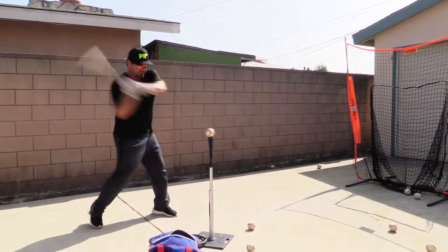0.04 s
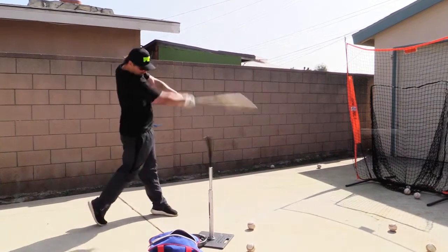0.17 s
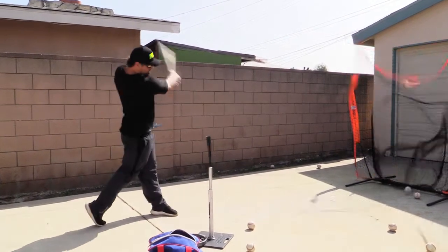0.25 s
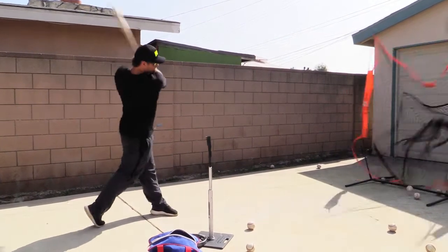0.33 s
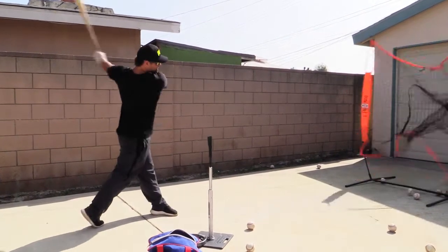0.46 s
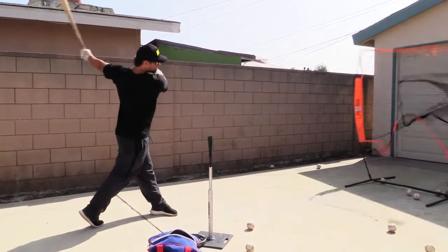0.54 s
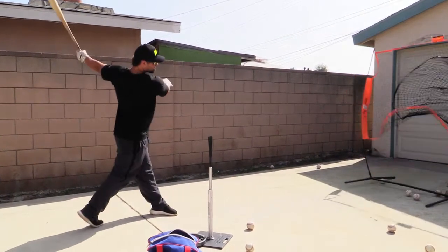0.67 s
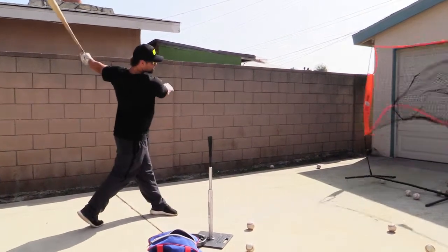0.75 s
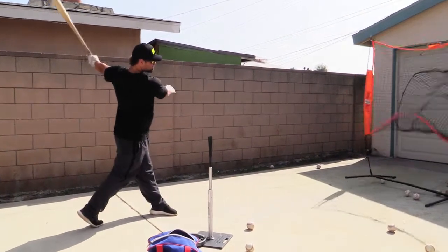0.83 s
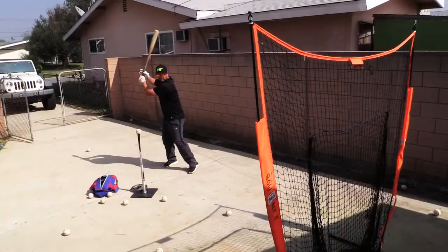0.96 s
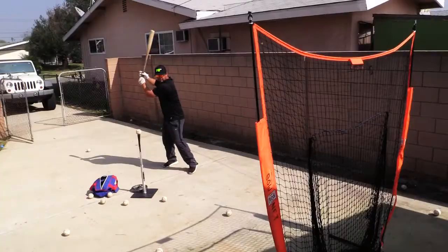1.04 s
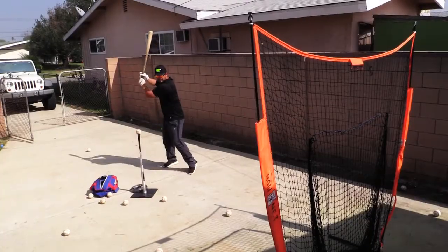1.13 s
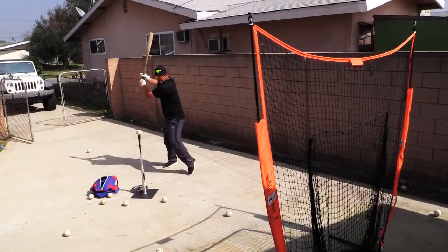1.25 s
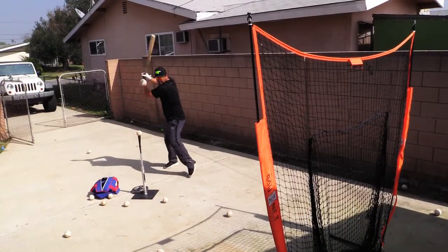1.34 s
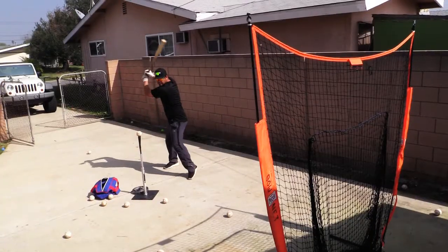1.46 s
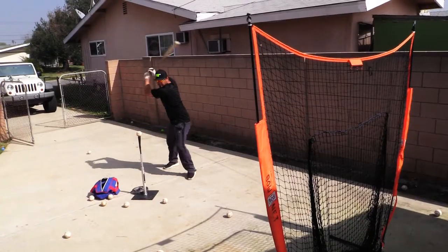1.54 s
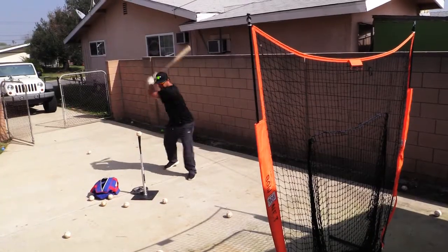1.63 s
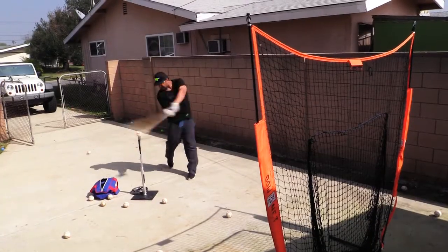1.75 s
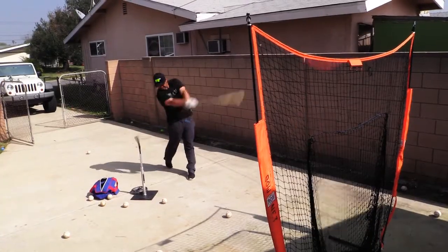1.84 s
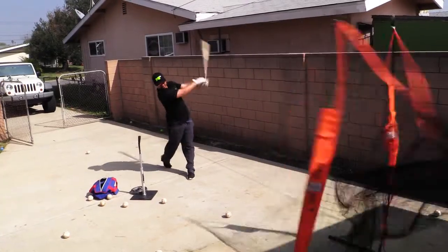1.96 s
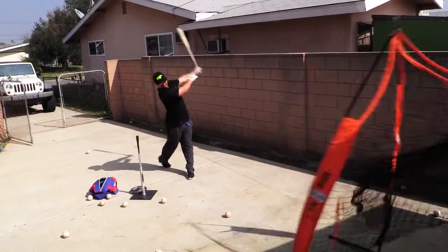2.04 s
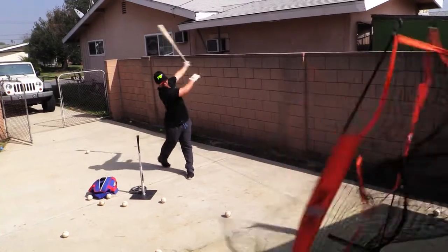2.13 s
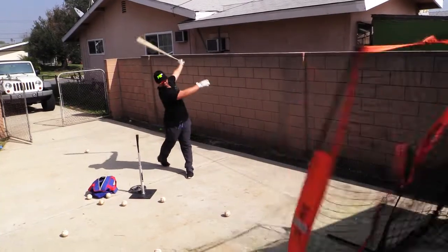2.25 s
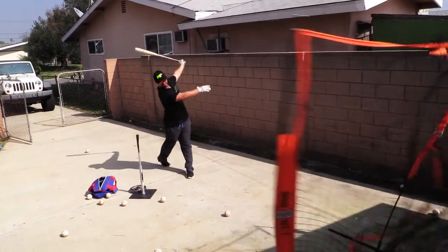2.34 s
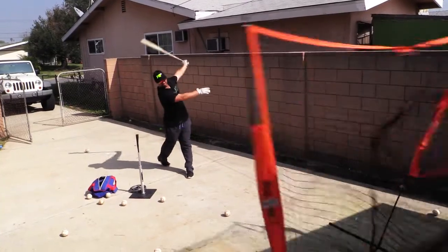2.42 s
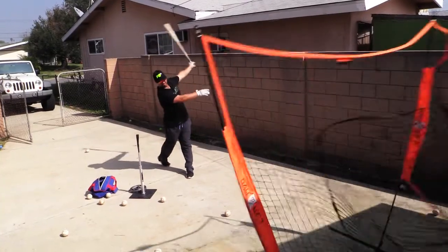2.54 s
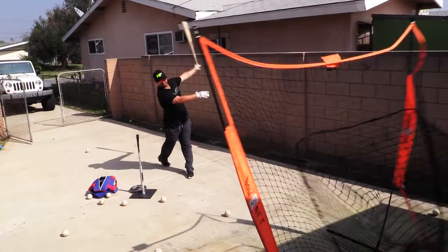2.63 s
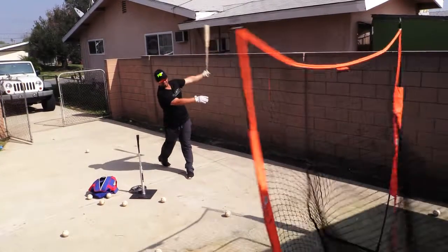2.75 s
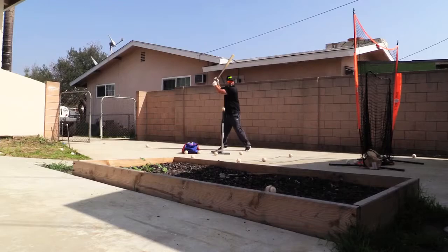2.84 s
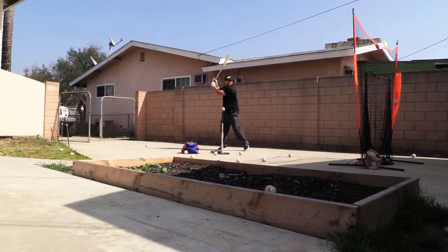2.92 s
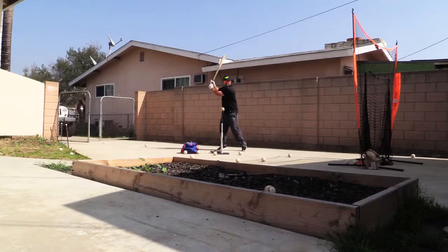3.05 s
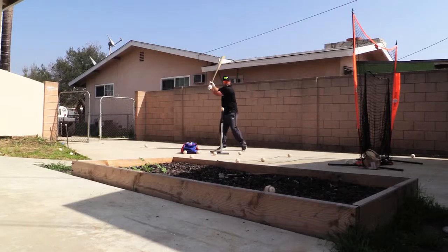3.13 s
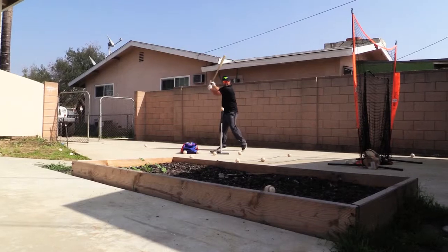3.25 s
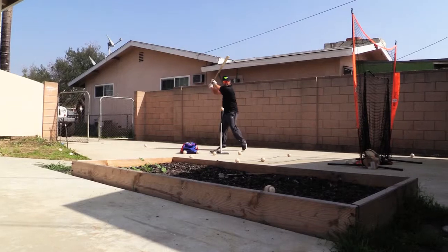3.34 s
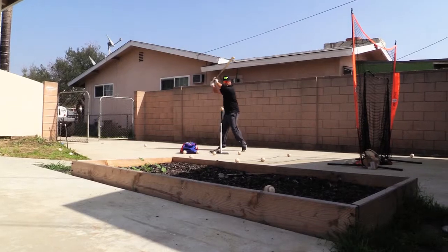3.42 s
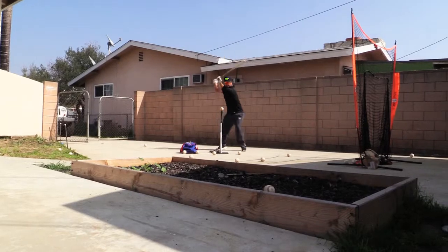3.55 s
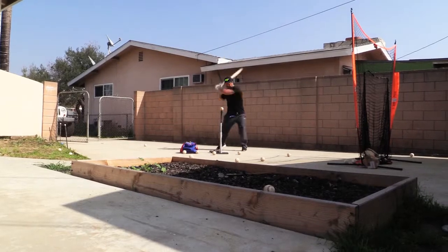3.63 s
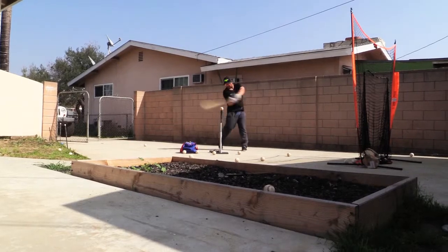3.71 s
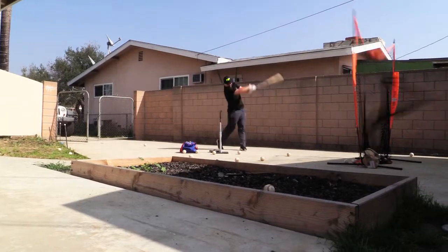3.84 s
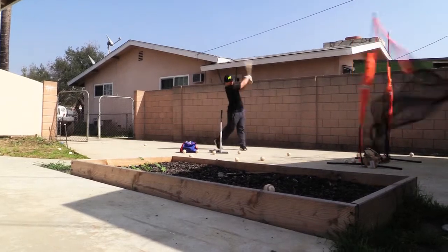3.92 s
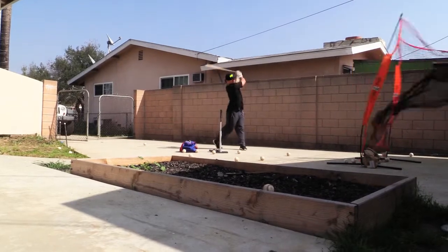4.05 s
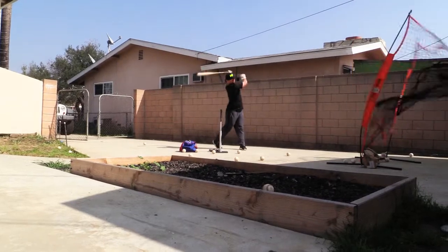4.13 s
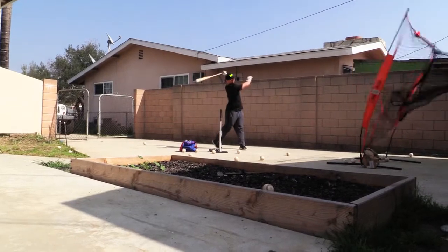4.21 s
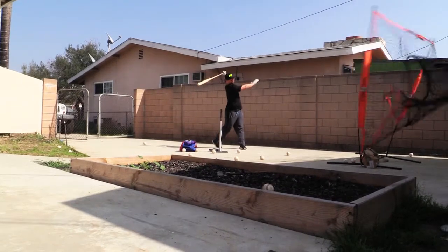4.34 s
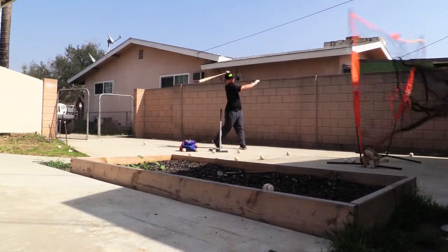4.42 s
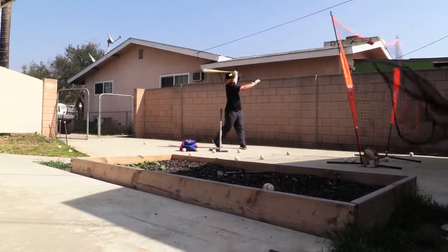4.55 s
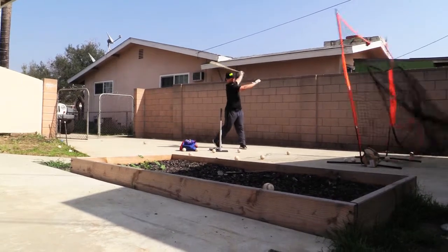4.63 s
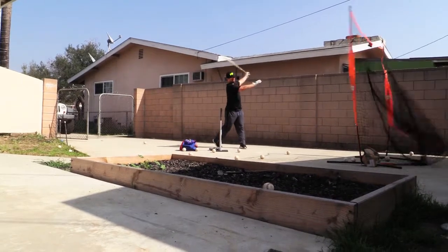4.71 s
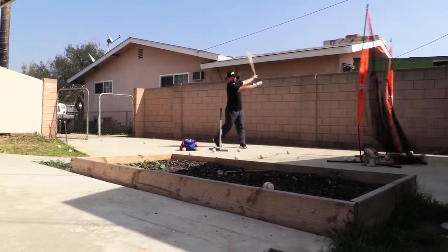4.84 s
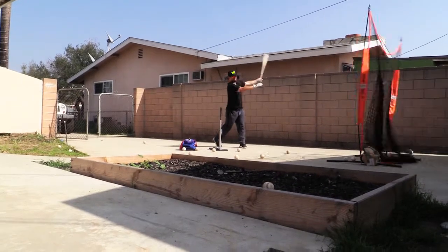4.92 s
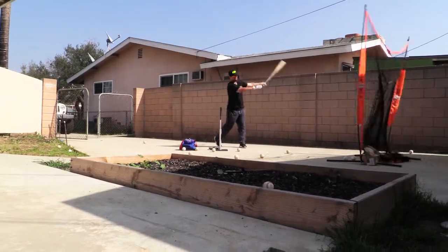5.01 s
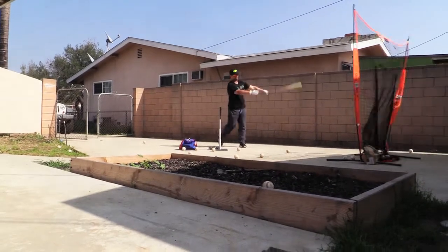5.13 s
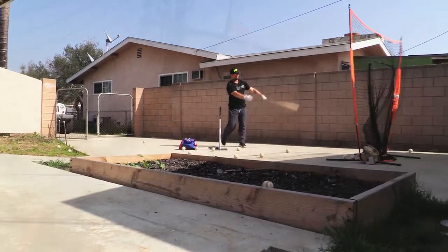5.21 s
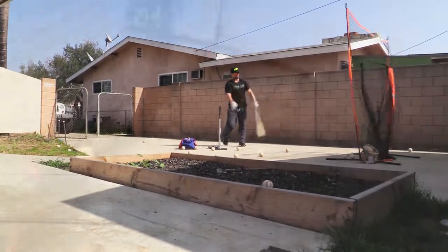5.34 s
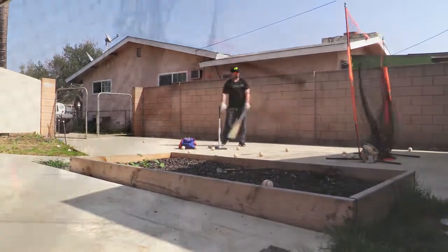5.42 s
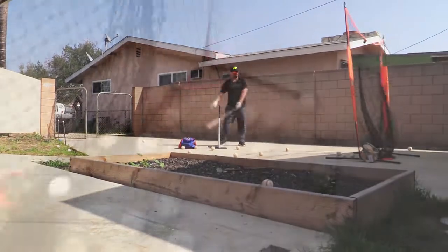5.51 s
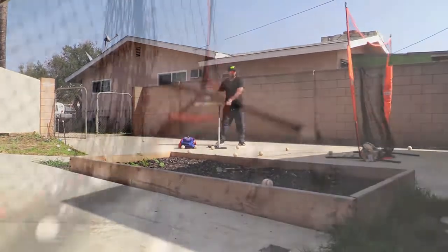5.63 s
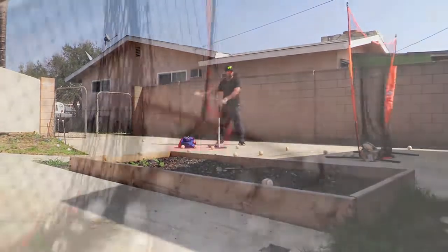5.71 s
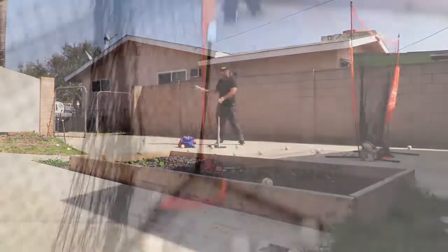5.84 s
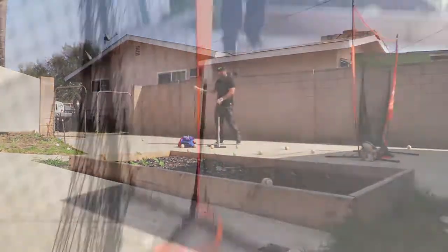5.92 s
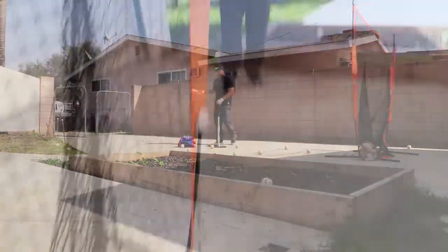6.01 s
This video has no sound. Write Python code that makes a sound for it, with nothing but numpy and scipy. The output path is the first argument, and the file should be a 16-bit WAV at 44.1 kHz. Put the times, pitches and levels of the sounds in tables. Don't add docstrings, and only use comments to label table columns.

```python
import sys
import numpy as np
from scipy import signal
from scipy.fft import rfft, irfft, next_fast_len
from scipy.io import wavfile
from scipy.ndimage import uniform_filter1d, map_coordinates

SR = 44100
rng = np.random.default_rng(int(sys.argv[2]) if len(sys.argv) > 2 else 0)


def gain_from_decibels(decibels):
    exponent = np.asarray(decibels, float) / 20
    return 10 ** exponent


def transcribe(u):
    v = np.clip(np.atleast_2d(u).T, -1, 1)
    q = np.round(v * 32767).astype(np.int16)
    wavfile.write(sys.argv[1], SR, q)


N = 267731
T = np.arange(N) / SR


def unit(x):
    return x / np.sqrt(np.mean(x ** 2) + 1e-20)


def along(points, hz):
    f, v = np.transpose(points)
    return np.interp(np.log(hz + 1), np.log(f + 1), v)


def filtered(x, response):
    m = next_fast_len(x.shape[-1] + 8192)
    spectrum = rfft(x, m) * response(np.fft.rfftfreq(m, 1 / SR))
    return irfft(spectrum, m)[..., :x.shape[-1]]


def resonance(f, hz, width_hz):
    damping = 1j * f * width_hz
    return damping / (hz * hz - f * f + damping)


def wobble(rate):
    knots = rng.standard_normal(int(N * rate / SR) + 4)
    return map_coordinates(knots, [T * rate])


def placed(x, lean_db):
    return x * gain_from_decibels([[lean_db / 2], [-lean_db / 2]])


def add(out, s, x):
    at = round(s * SR)
    out[:, at:at + x.shape[1]] += x[:, :N - at]


def patchy(x, db):
    z = signal.stft(x, nperseg=512)[2]
    field = uniform_filter1d(rng.standard_normal(z.shape[1:]), size=2, axis=0)
    field = uniform_filter1d(field, size=5, axis=1)
    return signal.istft(z * gain_from_decibels(db * unit(field)), nperseg=512)[1][:, :N]


# f/Hz, side over mid level/dB
WIDE = [(60, 2), (130, -5), (300, 1), (650, 8), (1200, 7), (2400, -2.5), (3100, -0.5), (4500, 7.5),
        (7500, 0), (15000, 1)]
# f/Hz, left over right level/dB
LEAN = [(60, 2.5), (200, 9), (400, 5.5), (700, 1), (2400, 1.5), (15000, 1.5)]
# f/Hz, share of the side that is the mid a quarter cycle late
TURNED = [(60, 0.24), (600, 0.68), (3000, 0.22), (5000, .5), (7000, -.3), (15000, 0)]


def diffuse(source, spectrum):
    mid, other = patchy(source, db=1.5)
    share = lambda hz: np.clip(along(TURNED, hz), -1, 1)
    late = filtered(mid, lambda hz: -1j * share(hz))
    side = late + filtered(other, lambda hz: np.sqrt(1 - share(hz) ** 2))
    colour = lambda hz: gain_from_decibels(along(spectrum, hz) + [0 * hz, along(WIDE, hz)])
    mid, side = filtered(np.array([mid, side]), colour)
    balance = lambda hz: gain_from_decibels(np.outer([.5, -.5], along(LEAN, hz)))
    pair = filtered(np.array([mid + side, mid - side]), balance)
    return pair / np.std(pair.mean(axis=0))


def grit(per_second, spread_db):
    hit = rng.random((2, N)) < per_second / SR
    sign = rng.choice([-1, 1], (2, N))
    size_db = spread_db * np.minimum(rng.exponential(size=(2, N)), 3)
    return unit(hit * sign * gain_from_decibels(size_db))


def burst(t60, rise, grit_db):
    t = np.arange(SR // 3) / SR
    noise = rng.standard_normal((2, len(t)))
    rub = noise * gain_from_decibels(grit_db * np.minimum(rng.standard_normal(len(t)), 1.6))
    return unit(rub) * gain_from_decibels(-60 * t / t60) * (1 - np.exp(-t / rise))


CUT_S = [0, .932, 2.596]


def until_cut(s, x):
    end = min([c for c in CUT_S if c > s] + [N / SR + 1])
    return x[:, :round((end - s) * SR)]


CRACK_S = [
    .0999,
    1.7512,
    3.7315,
    4.9502,
    4.6143,
]
# level/dB, left over right level/dB
CRACKS = [(4.5, 6), (6, 8), (2, 5.5), (-8, 5.5), (-6.5, 0)]
# f/Hz, level/dB, T60/s
BAT = [
    [(606, -13, 0.03), (791, -6, 0.037), (1030, 1, 0.016), (2136, -2.5, 0.015), (2720, 1.5, 0.013),
     (4600, -17, 0.015), (8300, -18, 0.013)],
    [(620, -43, 0.029), (1193, -14, 0.031), (2000, -4.5, 0.02), (2900, 2, 0.01), (4740, -3.5, 0.0045),
     (7060, -32, 0.0088)],
    [(606, -46, 0.099), (1105, -7, 0.026), (1760, 7.5, 0.0098), (2500, 1.5, 0.0065), (3395, -4.5, 0.0085),
     (5060, -4, 0.0045), (7440, -28, 0.0095)],
    [(1330, -7, 0.03), (2130, -17, 0.037), (2490, -0.5, 0.0084), (2850, -0.5, 0.0075), (3970, -8, 0.017),
     (5600, -6, 0.006), (7540, 7.5, 0.0067), (9460, 5, 0.0053), (11200, 5, .005), (13300, 0, 0.004)],
    [(1760, -4, 0.028), (2650, 2, 0.0037), (7850, -2, 0.011)],
]
# delay/s, left over right level/dB
WALLS = [
    [(.0085, -3), (.015, 3), (.023, 4), (.027, -4), (.033, -3), (.054, 1), (.058, -2), (.0915, 4),
     (.118, 5), (.137, -2), (.157, 4), (.215, 2)],
    [(.0022, 1), (.007, 1), (.012, 1), (.016, 1), (.033, 1), (.038, 1), (.0435, -1), (.0635, 1), (.174, -1)],
    [(.005, 1), (.014, 1), (.027, -1), (.0375, 3), (.0655, 2), (.11, 1)],
    [(.004, -1)],
    [(.003, -2)],
]
SLAP_DB = [-15.5, -12.5, -14, -18, -22]


def bat():
    out, t = np.zeros((2, N)), np.arange(SR // 8) / SR
    for s, (db, lean_db), modes, walls, near_db in zip(CRACK_S, CRACKS, BAT, WALLS, SLAP_DB):
        ring = 0
        for hz, mode_db, t60 in modes:
            blur = .1 * rng.standard_normal(len(t)).cumsum()
            ring = ring - gain_from_decibels(mode_db - 60 * t / t60) * np.sin(2 * np.pi * hz * t + blur)
        ring = ring * (1 + 0.035 * rng.standard_normal((2, len(t)))) * (1 - np.exp(-t / 0.00017))
        crunch = 0.49 * gain_from_decibels(-60 * t / 0.0036) * rng.standard_normal((2, len(t)))
        ring = gain_from_decibels(db) * (ring + crunch)
        late_left = np.array([np.roll(ring[0], shift=2), ring[1]])
        add(out, s, placed(late_left, lean_db))
        for delay, side_db in walls:
            slap_db = near_db - 9.5 * np.log10(50 * delay)
            rough = rng.standard_normal((2, 200)) * gain_from_decibels(-60 * t[:200] / 0.0063)
            copy = signal.fftconvolve(ring, rough / np.linalg.norm(rough[0]), axes=1)
            copy = filtered(copy, lambda f: resonance(f, 2500, 6600) ** 2)
            add(out, s + delay, gain_from_decibels(slap_db) * placed(copy, side_db))
    return filtered(out, lambda f: (1j * f / (1j * f + 350)) ** 4)


# idle rustle level/dB, thump share level/dB, fizz share level/dB
PLACES = [
    (-66, 2.5, -1),
    (-61, 1.5, 2.5),
    (-61, 1.5, -1),
]
# level/dB at contact, net filling delay/s, net level/dB, sway below net level/dB
SWINGS = [
    (-26.5, 0.21, -19, 10),
    (-31, 0.17, -18, 15),
    (-41, 0.11, -16.5, 26),
]
SWAY_DB_PER_S = [32.5, 20, 18]
NET_WAKES_S = [0.016, 0.051, 0.015]
# t/s, level/dB, fade rate/(dB/s)
SETTLES = [
    (2.47, -40.5, 48),
    (4.266, -39.5, 113),
    (4.62, -26, 103),
    (4.84, -48.5, 7),
    (1.9, -46, 150),
]
SETTLE_RISE_DB_PER_S = [490, 43, 1400, 8.7, 120]


def effort():
    place = np.searchsorted(CUT_S, T, side="right") - 1

    def peak(s, db, rise, fall):
        slope = np.where(T < s, rise, fall)
        return gain_from_decibels(2 * (db - slope * np.abs(T - s)))

    power = gain_from_decibels(2 * np.array([row[0] for row in PLACES]))[place]
    swings = zip(CRACK_S, SWINGS, SWAY_DB_PER_S, NET_WAKES_S)
    for k, (s, (swing_db, fill, net_db, sway_db), calm, onset) in enumerate(swings):
        net = peak(s + fill, net_db, 42, 98.5) + peak(s + fill, net_db - sway_db, 0, calm)
        net = net * np.clip((T - s) / onset, 0, 1) ** 2
        power = power + (place == k) * np.where(T < s, peak(s, swing_db, 103, 0), net)
    for (s, db, fade), rise in zip(SETTLES, SETTLE_RISE_DB_PER_S):
        power = power + (place == place[round(s * SR)]) * peak(s, db, rise, fade)
    return 10 * np.log10(uniform_filter1d(power, size=300)), place


# f/Hz, level/dB per Hz
BODY = [(350, -62), (600, -18.5), (830, -6), (1200, -4), (1300, -3.5), (1430, 0), (1660, -0.5), (1950, 0.5),
        (2620, 2), (5500, -22.5), (7150, -32), (12100, -120)]
# f/Hz, level/dB per Hz
THUMP = [(15, -68), (25, -49), (102, -29), (301, -9), (407, -10), (479, -6.5), (533, -6), (900, -7.5),
         (1170, -17), (1980, -120)]
# f/Hz, level/dB per Hz
FIZZ = [(2650, -18.5), (4500, -5.5), (5400, -13.5), (6420, -3.5), (6630, -3), (8580, -4), (14100, -17.5),
        (15700, -19), (16300, -41)]


def rush():
    body_db, place = effort()
    thump_share, fizz_share = np.array([row[1:] for row in PLACES])[place].T
    thump_db = -48 + 0.6 * (body_db + 36) + thump_share
    fizz_db = -50 + 0.65 * (body_db + 35.5) + fizz_share
    cords = unit(rng.standard_normal((2, N)) + .5 * grit(1200, spread_db=2.5))
    clumps = np.minimum(1.5 * wobble(130) + .6 * wobble(45), 2)
    out = gain_from_decibels(body_db + 2.5 + clumps) * diffuse(cords, BODY)
    out += gain_from_decibels(fizz_db + 1.0 + 0.47 * clumps) * diffuse(cords, FIZZ)
    thump = diffuse(rng.standard_normal((2, N)), THUMP)
    return out + gain_from_decibels(thump_db - 3.0 + 2.97 * wobble(25.02)) * thump


# t/s, peak level/dB, ring f/Hz, treble level/dB, left over right level/dB
SNAPS = [(0.122, -2, 1440, -28, 1), (0.127, -2, 2220, -29, 1), (0.153, -4, 1820, -29, 10),
         (0.156, -3, 2470, -30, 10), (0.191, -3, 2000, -22, 5), (0.217, -2, 2460, -22.5, 11),
         (0.255, 0, 2300, -27, 2.5), (0.299, -9, 2300, -25, 7), (0.313, -4, 2310, -29, 1.5),
         (0.542, -16, 2180, -26, 5), (0.647, -9.5, 1860, -34, -1.5), (1.705, -12, 1630, -20, -1),
         (1.718, -17, 2000, -7, 1.0), (1.793, -7, 2640, -27, 3.0), (1.814, -12, 2800, -22, 2.0),
         (1.824, -2.5, 2700, -15, 4), (1.848, -1, 2680, -22, -2), (1.871, 0, 2780, -28, -1),
         (1.88, -10, 2200, -26, 1.0), (1.899, -15, 2300, -27, 1), (1.925, -1, 1790, -37, 2),
         (1.943, -2, 1200, -32, -3), (2.009, -8, 2220, -29, 0.5), (2.106, -25, 2330, -21, -1.5),
         (2.169, -5.5, 1950, -18.5, -5), (2.258, -21, 1760, -25, -9), (2.562, -14.5, 1280, -5.5, -2),
         (3.744, 1, 3300, -17, 0), (3.768, -11, 1940, -28, 4.0), (3.795, -9, 1440, -16, 4),
         (3.841, -17, 2010, -27, 1.5), (3.947, -2, 2580, -36, -4), (4.241, -15, 1590, -27, -6),
         (4.564, -20, 2060, -13, -2.0), (4.6134, -3, 2900, -36, -5), (4.651, -11, 2740, -28, 2.5),
         (1.706, -16, 2600, -22, 0), (1.709, -10, 1660, -26, 4)]
# t/s, peak level/dB, ring f/Hz, treble level/dB, left over right
# level/dB
MORE_SNAPS = [(0.2694, -6, 2080, -29, 4.0), (0.2814, -8, 2020, -24, 3.5), (0.3204, -6, 2330, -24, 1.5),
              (0.349, -8, 1840, -24, 4.0), (0.359, -8, 2000, -25, 3.0), (0.4397, -11, 1950, -24, 2.5),
              (1.7878, -8, 2600, -24, 3.5), (1.8294, -6, 2870, -24, 0.0), (1.9654, -11, 2250, -24, 1.0),
              (1.9784, -11, 2120, -24, -0.5), (1.9904, -11, 2370, -24, 0.0), (2.0164, -15, 1980, -24, 0.5),
              (2.0484, -18, 1810, -24, 0.5), (3.859, -9, 2640, -22, 1.5), (3.8774, -7, 2280, -24, 1.0),
              (4.2514, -26, 2610, -24, -0.5), (4.2624, -22, 1590, -24, 1.0), (4.2951, -24, 2570, -24, -1.0),
              (5.2485, -28, 2160, -22, 1.5)]


def snaps():
    out, t = np.zeros((2, N)), np.arange(SR // 20) / SR
    for s, db, hz, treble_db, lean_db in SNAPS + list(MORE_SNAPS):
        draw = rng.standard_normal((3, len(t)))
        phase = 2 * np.pi * hz * t + 0.057 * draw[2].cumsum() + [[0], [.8]]
        ring = np.sin(phase) * gain_from_decibels(-60 * t / 0.0083) * (1 - np.exp(-t / 0.0003))
        ring = filtered(ring, lambda f: (1j * f / (1j * f + 300)) ** 3)
        tick = filtered(draw[:2] * gain_from_decibels(-60 * t / 0.0052), lambda f: resonance(f, 5800, 7200) ** 2)
        both = placed(ring + gain_from_decibels(treble_db + 11) * tick, lean_db)
        add(out, s + .0008, gain_from_decibels(db - 1) * both)


    return out


# t/s, peak level/dB, centre f/Hz, left over right level/dB
RATTLES = [
    (4.561, -17.5, 2070, -2.5),
    (4.6486, -15, 2360, 2),
    (5.3745, -20.5, 1990, -3),
]
TAPS = [(.8645, -25, 1180, -1), (.864, -29, 1820, -2), (.874, -24.5, 2500, -7), (.8815, -30.5, 3950, -3),
        (.882, -33, 2550, 1), (.9044, -33.5, 2500, 6)]
CLINKS = [(1.7144, -22, 2000, -11), (2.1024, -13, 2370, -4), (2.2545, -16, 1500, 2), (2.553, -15, 1900, -1),
          (3.694, -26, 2170, 7), (4.207, -15.5, 1710, -5), (4.2229, -26, 1620, -12),
          (4.2401, -22, 1580, -1), (4.6118, -4, 2760, -2.5), (4.6296, -9.5, 2280, 1)]
KNOCKS = [
    (1.7035, -6.5, 1920, 2.5),
    (3.6819, -13.5, 1750, 1),
    (3.71, -14.5, 1760, 8),
    (3.9464, -16, 2580, -3),
    (5.249, -23.5, 2690, 1),
    (4.541, -37, 2300, -1),
]
DRAGS = [
    (.0214, -23.5, 2850, 13.5),
    (1.5196, -28, 2900, -2),
    (3.6373, -30.5, 1410, 4),
]
BRUSHES = [(.6194, -15, 2500, -3), (.7294, -22.5, 2530, 1), (1.3012, -31.5, 1490, 9),
           (2.155, -12, 2310, -5), (2.169, -11.5, 1880, -4), (2.364, -17, 2640, -2),
           (2.5607, -12, 1440, -3), (4.2936, -22.5, 2570, -8), (5.404, -19, 2100, 8), (2.51, -22, 2500, -5),
           (2.59, -26, 2200, 3)]
SCRAPES = [(.6477, -6.5, 1640, 1), (1.6222, -21, 2130, -5), (2.0068, -6, 2220, -1),
           (2.2565, -11.5, 1680, -7), (2.3095, -23, 2040, -9), (2.34, -15, 2140, -3),
           (2.5756, -15.5, 2490, -3), (4.9082, -33, 2190, -11), (5.288, -39, 2820, 5),
           (5.438, -14.5, 2200, 1), (5.52, -27.5, 2550, 0)]
# rows, rise/s, T60/s, body width/Hz, jingle level/dB
CONTACTS = [(RATTLES, 0.00202, 0.22, 2650, -17), (TAPS, 0.00083, 0.11, 810, -6),
            (CLINKS, .0015, 0.087, 2500, -13), (KNOCKS, .001, 0.055, 2450, -18.5),
            (DRAGS, 0.019, 0.28, 2340, -13), (BRUSHES, .012, 0.083, 3000, -12),
            (SCRAPES, .014, 0.095, 2300, -22.5)]
# f/Hz, width/Hz, level/dB
JINGLE = [(7450, 530, 7), (8030, 280, 1), (8710, 290, 4.5), (10160, 120, 0), (11800, 400, -5),
          (9350, 5100, -7)]
# t/s, peak level/dB, centre f/Hz, T60/s
THUDS = [(.106, -5, 786, 0.055), (1.915, -14, 905, 0.21), (1.96, -17.5, 960, 0.3), (2.26, -28, 503, 0.075),
         (4.93, -35.5, 520, 0.24), (0.298, -9.5, 890, 0.07), (0.637, -24.5, 810, 0.21),
         (1.704, -32, 755, 0.13), (1.761, -2, 930, 0.026), (2.029, -31, 759, 0.072),
         (2.168, -26.5, 775, 0.27), (3.682, -32.5, 869, 0.15), (3.928, -13, 840, 0.11),
         (4.611, -32.5, 900, 0.41), (4.757, -27, 500, 0.19), (5.114, -39, 526, 0.38),
         (5.378, -31.5, 860, 0.22), (6.01, -46, 100, 0.62)]


def knocks():
    out = np.zeros((2, N))

    def fittings(f):
        return sum((-1) ** k * gain_from_decibels(g) * resonance(f, hz, w) for k, (hz, w, g) in enumerate(JINGLE))

    for rows, rise, t60, width_hz, jingle_db in CONTACTS:
        for s, db, hz, lean_db in rows:
            def colour(f):
                body = 2.43 * np.sqrt(2530 / width_hz) * resonance(f, hz, width_hz) ** 3
                return body + 1.65 * gain_from_decibels(jingle_db) * fittings(f)

            hit = placed(filtered(burst(t60, rise, grit_db=6.0), colour), lean_db)
            slow_db = 337 * min(rise, .012)
            add(out, s - rise / 2, gain_from_decibels(db - 2.5 + slow_db) * until_cut(s, hit))
    for s, db, hz, t60 in THUDS:
        thud = filtered(burst(t60, 0.0043, grit_db=7.5), lambda f: resonance(f, hz, 950) ** 2)
        add(out, s - .002, gain_from_decibels(db + 12.5) * placed(thud, 3.8))
    return out


# t/s, level/dB, T60/s
FRAME = [
    [(.115, -39, .35), (.19, -43, 0.38), (3.74, -29.5, 0.65), (3.815, -34, 0.35)],
    [(4.21, -32.5, 0.21), (4.30, -53, 0.76), (4.62, -35, 0.41)],
    [(2.6, -56, 1.2)],
    [(.945, -57, 0.41), (4.3, -46, 0.45)],
]
FRAME_HZ = [
    [6810],
    [7220, 7650, 8200, 8700],
    [8950],
    [7200],
]
FRAME_WIDTH_HZ = [110, 220, 500, 120]
FLUTTER_DB = [2.5, 5, 3, 2]


def frame():
    out = np.zeros((2, N))
    for hz, width_hz, flutter_db, blows in zip(FRAME_HZ, FRAME_WIDTH_HZ, FLUTTER_DB, FRAME):
        modes = lambda f: sum(resonance(f, mode, width_hz) ** 2 for mode in hz)
        shaken = unit(filtered(rng.standard_normal((2, N)), modes))
        decay = sum((T > s) * gain_from_decibels(db - 60 * np.abs(T - s) / t60) for s, db, t60 in blows)
        out += shaken * gain_from_decibels(flutter_db * wobble(60)) * decay
    return out


# t/s, peak level/dB, ring f/Hz, T60/s
PINGS = [(4.1729, -26, 7790, 0.03), (4.2088, -26, 8250, 0.026), (4.2214, -29, 7210, 0.03),
         (4.2394, -33, 7620, 0.03), (4.3001, -38, 7160, 0.03), (4.3176, -35, 7160, 0.03),
         (4.3324, -38, 7240, 0.03), (4.377, -43, 7690, 0.03), (4.5645, -26, 7850, 0.03),
         (4.5774, -32, 7760, 0.03), (4.6139, -24, 7670, 0.026), (4.6264, -20, 7320, 0.03),
         (4.6463, -23, 7770, 0.03), (4.6714, -31, 7480, 0.03), (4.7182, -33, 7670, 0.03),
         (4.7344, -38, 7820, 0.03), (5.1272, -34, 7500, 0.03), (5.1404, -34, 7250, 0.03),
         (5.1594, -39, 7550, 0.03)]
# frequency ratio, level/dB
PING_OVERTONES = [(1, 1), (1.09, -6), (1.33, -14)]


def pings():
    out, t = np.zeros((2, N)), np.arange(SR // 10) / SR
    for s, db, hz, t60 in PINGS:
        drift = 0.078 * rng.standard_normal((2, len(t))).cumsum(axis=1)
        ring = sum(gain_from_decibels(g) * np.sin(2 * np.pi * hz * ratio * t + drift) for ratio, g in PING_OVERTONES)
        add(out, s, gain_from_decibels(db - 3.5 - 60 * t / t60) * (1 - np.exp(-t / .0006)) * ring)
    return out


# t/s, peak level/dB, centre f/Hz, T60/s
TICKS = [(1.2394, -40, 6200, 0.052), (2.6364, -41, 8040, 0.056), (2.9452, -39, 7150, 0.048),
         (2.9901, -46.5, 6330, 0.11), (3.015, -40.5, 8260, 0.085), (3.1085, -43.5, 7850, 0.096),
         (3.3864, -45, 6470, 0.096), (3.4062, -39.5, 7300, 0.074), (4.0881, -37, 6340, 0.049),
         (4.128, -37.5, 7540, 0.06), (4.096, -43, 7900, 0.044), (4.378, -45, 7600, 0.051),
         (3.402, -44, 9500, .05), (4.165, -37, 7000, 0.05), (5.1263, -46, 7450, 0.14)]


def ticks():
    out = np.zeros((2, N))
    for s, db, hz, t60 in TICKS:
        rustle = filtered(burst(t60, 0.0034, grit_db=17.0), lambda f: resonance(f, hz, 2400) ** 2)
        add(out, s - .002, gain_from_decibels(db + 13.0) * rustle)
    return out


# start t/s, length/s, top after t/s, top f/Hz, level/dB
ARCHES = [
    (2.343, 0.138, .068, 4970, -46.5),
]
SWOOPS = [(5.664, .065, .079, 5000, -40.5), (5.68, .055, .08, 4900, -43), (5.675, .04, .075, 3900, -46)]
DIVES = [(5.758, .06, .004, 4250, -42), (5.775, .045, -.03, 4250, -44), (5.735, .035, .01, 4800, -51)]
SLURS = [(1.185, .115, .11, 6120, -56), (1.313, .035, .045, 6080, -55), (1.285, .04, .02, 4800, -55),
         (1.35, .012, 0, 6050, -61), (1.368, .016, 0, 6100, -61), (1.41, .02, 0, 6000, -65)]
FALLS = [(3.16, .142, .025, 3170, -39.5), (3.235, .05, -.06, 3100, -47), (3.252, .028, -.13, 6250, -36),
         (3.225, .04, -.01, 3650, -50)]
HUSKS = [(.97, 0.13, .08, 4510, -59), (3.12, 0.23, .004, 4700, -58.5), (3.46, 0.15, 0.088, 4700, -57),
         (5.645, 0.046, .03, 5600, -56), (5.648, .055, .05, 2790, -47.5), (5.83, 0.073, .05, 3870, -54.5)]
# rows, bend/(Hz/s^2), phase scatter/rad, loudest this far under the top/kHz,
# loss a kHz away level/dB, flutter level/dB
BIRD_KINDS = [(ARCHES, 330000, .9, .8, 3, 4), (SWOOPS, 500000, 1.4, .8, 5, 3),
              (DIVES, 170000, 1.2, .05, 6, 3), (SLURS, 60000, 1, .05, 7, 4),
              (FALLS, 88000, .35, .7, 17, 2.8), (HUSKS, 35000, 2.6, .05, 3, 2)]


def birds():
    song = np.zeros(N)
    for rows, bend, hoarse, best, loss_db, flutter_db in BIRD_KINDS:
        for s, length, top, hz, db in rows:
            sag = np.minimum(bend * (T - s - top) ** 2, hz - 1000)
            turn = 2 * np.pi * np.cumsum(hz - sag) / SR + hoarse * wobble(500)
            edge = np.clip(np.minimum(T - s, s + length - T) / 0.0052, 0, 1)
            note_db = db - loss_db * np.abs(sag / 1000 - best) + 4.0 + flutter_db * wobble(130)
            song += edge * gain_from_decibels(note_db) * (np.sin(turn) + gain_from_decibels(-24) * np.sin(2 * turn))
    t = np.arange(SR // 2) / SR
    tail = rng.standard_normal((2, len(t))) * gain_from_decibels(-60 * t / 0.32)
    tail = tail / np.linalg.norm(tail[0])
    echo = gain_from_decibels(-15) * placed(np.roll(song, round(.024 * SR)), -2.3)
    reverb = gain_from_decibels(-4) * signal.fftconvolve(song[None], tail, axes=1)[:, :N]
    return placed(song, 3.7) + echo + reverb


# f/Hz, level/dB per Hz
YARD = [(15, -48), (25, -17), (76, -16.5), (196, -2), (271, -4), (337, -1.5), (493, -6.5), (1050, 2),
        (1170, -0.5), (2370, -3), (3560, -2), (5350, -12.5), (8960, -21.5), (14600, -21), (16300, -40)]


def yard():
    return gain_from_decibels(-51.5 + 0.11 * wobble(8.6)) * diffuse(rng.standard_normal((2, N)), YARD)


def scene():
    return bat() + rush() + frame() + knocks() + ticks() + birds() + yard() + snaps() + pings()


def low_pass(x):
    return signal.sosfilt(signal.butter(12, 16050, fs=SR, output="sos"), x)


def record(dry):
    dull = filtered(dry, lambda f: 1 / (1 + (f / 15000) ** 8))
    limited = dull / (1 + np.abs(dull / .99) ** 12) ** (1 / 12)
    return low_pass(limited)


dry = scene()
out = record(dry)
transcribe(out)
```